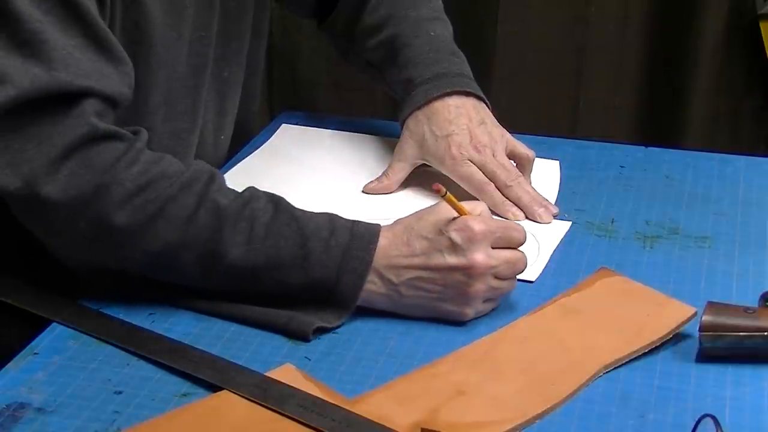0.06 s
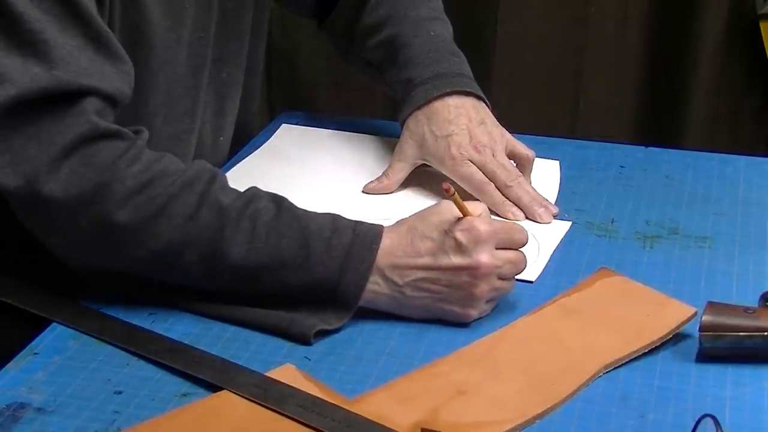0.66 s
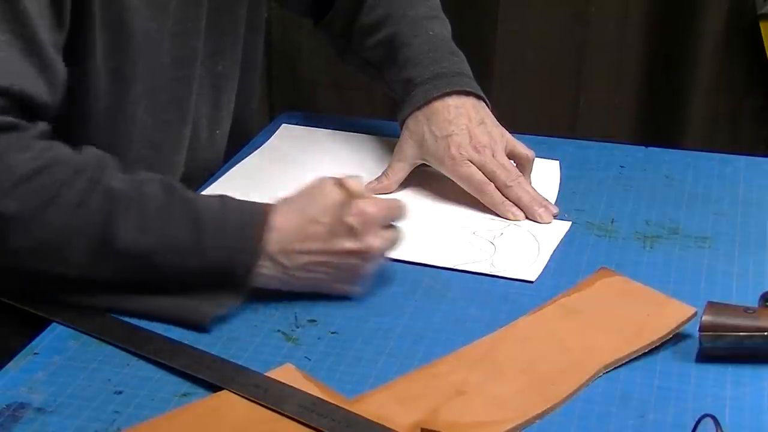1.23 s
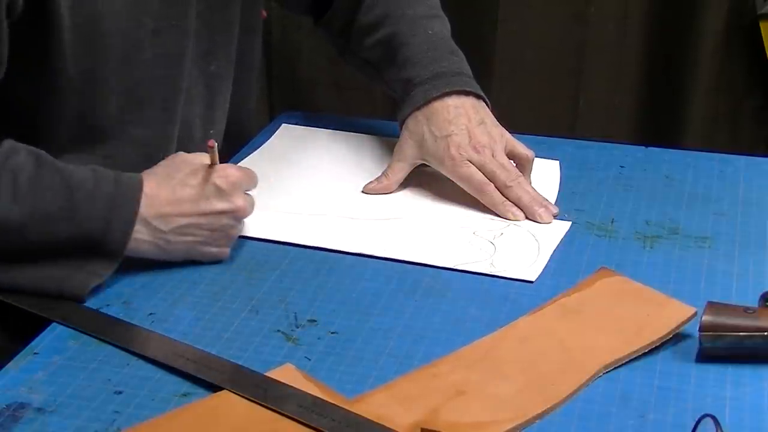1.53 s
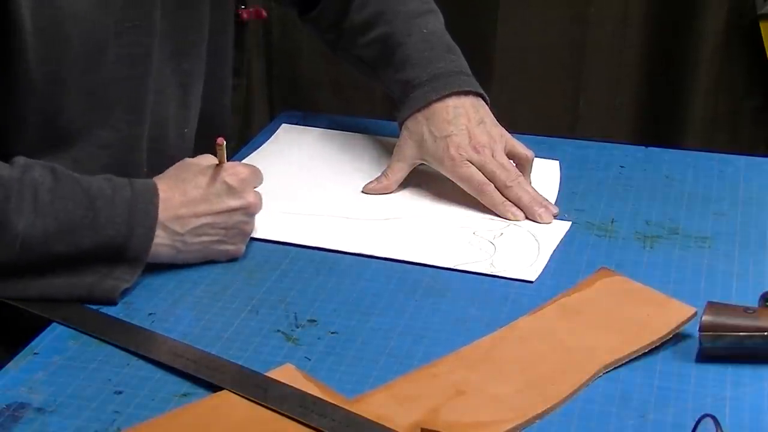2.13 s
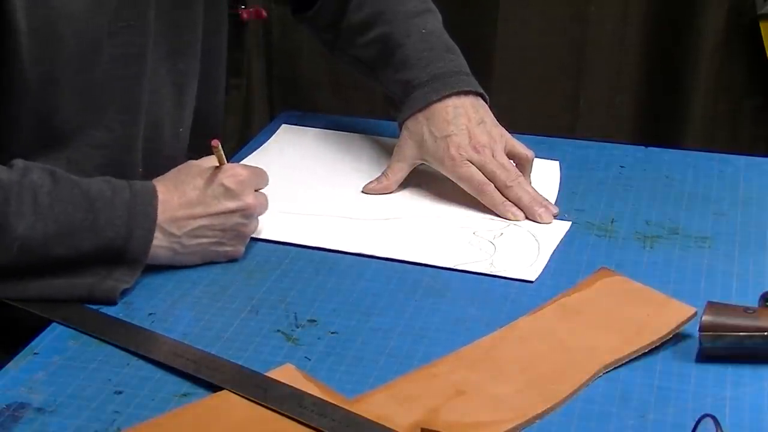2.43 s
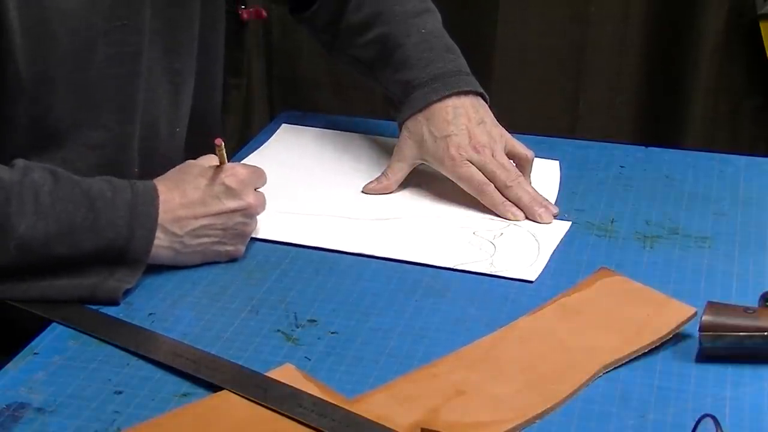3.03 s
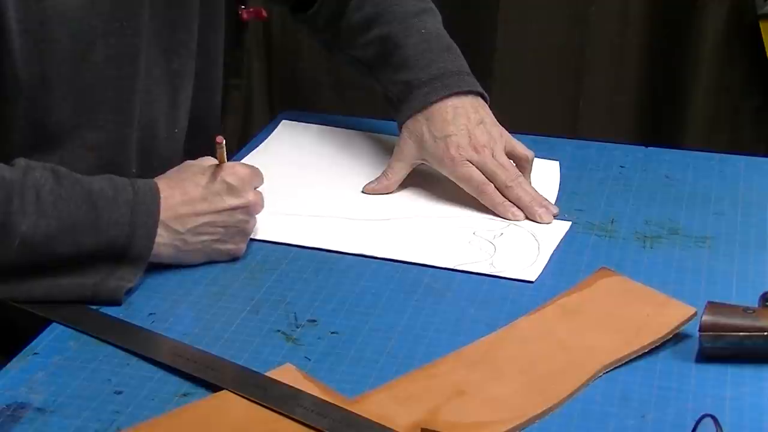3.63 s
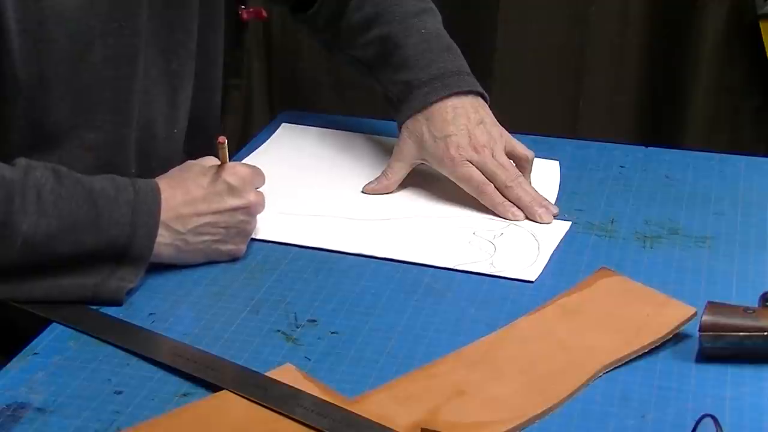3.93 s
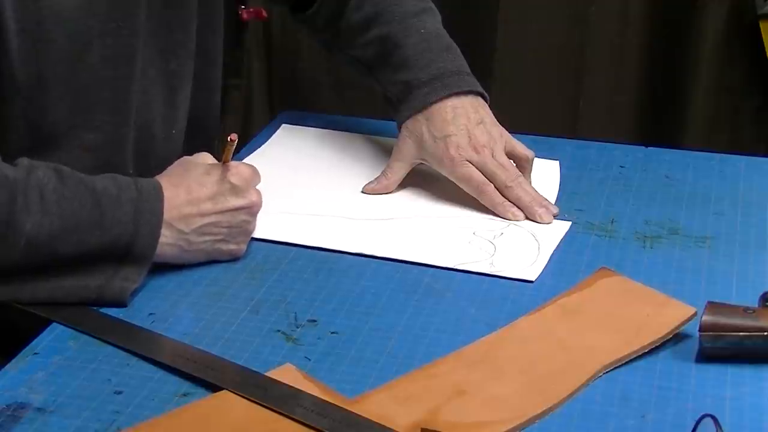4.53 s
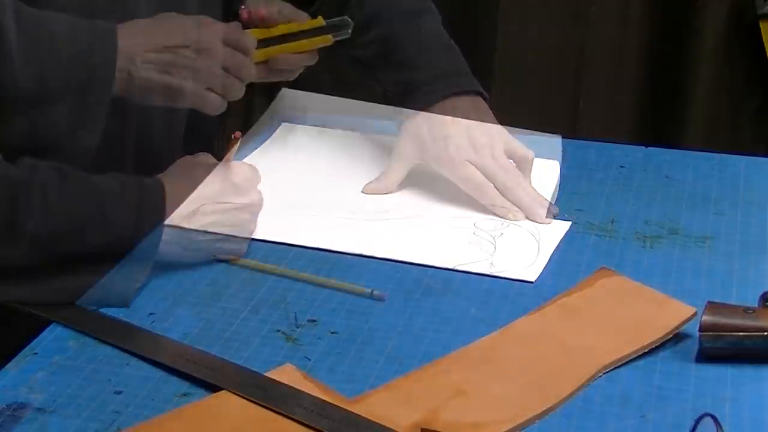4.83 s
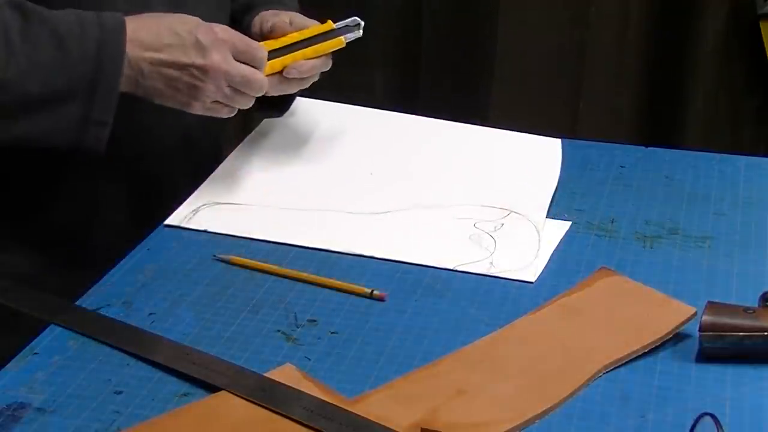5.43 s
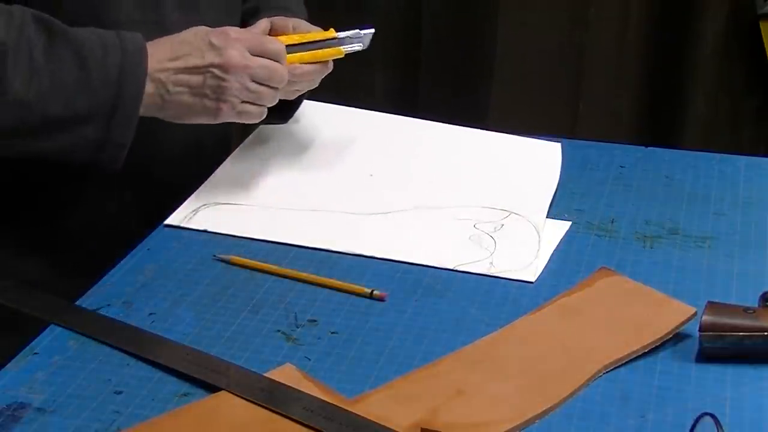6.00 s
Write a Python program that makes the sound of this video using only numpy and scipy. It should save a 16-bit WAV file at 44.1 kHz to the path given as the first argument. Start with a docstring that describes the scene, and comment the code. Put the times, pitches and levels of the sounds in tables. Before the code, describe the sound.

Close by in a small workshop with a low hum, a pencil taps and rubs on paper, squeaking faintly. A hand sweeps over the sheet before a slow drawn line and a series of short back-and-forth strokes. Then a low hollow drone rises and a plastic utility knife clicks over its notches, louder than the drawing. The blade scrapes briefly along its track and more crisp clicks follow, with slight room echo.

```python
"""A pencil traces a pattern on paper over a cutting mat: fibres catch and slip under the lead in short strokes
and one long line; the lead taps, digs in and squeaks thinly, and a hand sweeps the sheet. Then the slider of a
snap-off knife ratchets over its notches: steel snaps, the plastic handle rings. A small workshop hums
underneath and reflects the clicks; a hollow drone fades in at 4.75 s."""
import sys
import numpy as np
from scipy import signal
from scipy.fft import rfft, irfft, next_fast_len
from scipy.io import wavfile
from scipy.ndimage import uniform_filter1d

SR = 44100
rng = np.random.default_rng(int(sys.argv[2]) if len(sys.argv) > 2 else 0)


def file_out(sig):
    """Save sig as 16-bit WAV at sys.argv[1]."""
    # one column per channel
    cols = np.atleast_2d(sig).T
    # limit, then scale
    lim = np.clip(cols, -1, 1)
    pcm = np.round(lim * 32767).astype(np.int16)
    wavfile.write(sys.argv[1], SR, pcm)


N = 276066
TIME = np.arange(N) / SR
# hard contact spectrum, lead taps and blade scrape: f/Hz, level/dB
CONTACT_COLOUR = [(400, -26), (1400, -2.5), (1850, -5.5), (2250, 1.5), (2700, 0.5), (3300, -3), (4000, -2),
                  (5500, -6), (8000, -16), (12000, -11.5), (15500, -38)]


def amp(db):
    """Decibels to gain."""
    return 10 ** (np.asarray(db) / 20)


def unit_rms(x):
    """Scales to rms 1."""
    return x / np.sqrt(np.mean(x ** 2) + 1e-20)


def curve_at(points, hz):
    """Interpolates on a log-frequency axis."""
    f, value = np.transpose(points)
    return np.interp(np.log(hz + 1), np.log(f + 1), value)


def add(mix, start_s, sound):
    """Mixes a sound in at start_s."""
    part = mix[round(start_s * SR):][:len(sound)]
    part += sound[:len(part)]


def coloured(x, colour):
    """Shapes the spectrum, rolling off below its first point; rms 1."""
    size = next_fast_len(x.shape[-1])
    hz = np.fft.rfftfreq(size, 1 / SR)
    gain = amp(curve_at(colour, hz)) * np.minimum(hz / colour[0][0], 1) ** 2
    return unit_rms(irfft(rfft(x, size) * gain, size)[..., :x.shape[-1]])


def noise_pair(size, coherence):
    """Stereo white noise with the given coherence over frequency."""
    a, b = rfft(rng.standard_normal((2, next_fast_len(size))))
    same = curve_at(coherence, np.linspace(0, SR / 2, len(a)))
    return irfft([a, same * a + np.sqrt(1 - same ** 2) * b], next_fast_len(size))[:, :size]


def diffuse(colour):
    """Room-filling noise, alike at both ears only in the bass."""
    coherence = [(30, 0.57), (70, 0.87), (140, 0.32), (280, 0.39), (640, -0.32), (1400, 0.028),
                 (3100, -0.18), (15000, 0.17)]  # f/Hz, left-right coherence
    return coloured(noise_pair(N, coherence), colour)


def flutter(size, depth_db, window):
    """Random gain, smoothed over window samples."""
    return amp(depth_db * unit_rms(uniform_filter1d(rng.standard_normal(size), size=window)))


def impact(colour, decay_s, size=1024):
    """Briefly rattling contact: whitened dying noise through a minimum-phase click."""
    n = np.arange(size)
    burst = rfft(rng.standard_normal(size) * np.exp(-n / SR / decay_s))
    chatter = irfft(burst / np.sqrt(uniform_filter1d(abs(burst) ** 2, size=25))) * np.exp(-n / size)
    log_gain = np.log(amp(curve_at(colour, abs(np.fft.fftfreq(size, 1 / SR)))))
    click = np.fft.ifft(np.exp(np.conj(signal.hilbert(log_gain)))).real
    return signal.fftconvolve(chatter, click / np.linalg.norm(click))


def rub(gain, colour, grain_db, flutter_db=0):
    """Friction: the surface catches and lets go in tiny uneven snaps; flutter_db varies the pressure."""
    snaps = rng.choice([-1, 1], N) * (rng.random(N) < 5000 / SR)  # 5000 per s
    snaps = snaps * amp(grain_db * np.minimum(rng.exponential(1, N), 3))
    pressure = flutter(N, flutter_db, window=300)
    friction = (unit_rms(snaps) + 0.85 * rng.standard_normal(N)) * pressure
    return gain * coloured(friction, colour)


def stroke(start_s, length_s, db, crest=0.5, swell=1.34):
    """Gain of one movement: friction follows hand speed, which peaks at the fraction crest."""
    way = np.clip((TIME - start_s) / length_s, 0, 1) ** (np.log(0.5) / np.log(crest))
    speed = 1 - (2 * way - 1) ** 2
    return amp(db) * speed ** swell


def strokes(rows, **shape):
    """Gain of a run of strokes."""
    return sum(stroke(*row, **shape) for row in rows)


def held(start_s, end_s, db, attack_s, release_s=0.1, db_per_s=0):
    """Gain of a lasting sound: linear rise, level drift, exponential release."""
    rise = np.clip((TIME - start_s) / attack_s, 0, 1)
    fall = np.exp(-np.maximum(TIME - end_s, 0) / release_s)
    return rise * fall * amp(db + db_per_s * (np.clip(TIME, start_s, end_s) - start_s))


def room_tone():
    """Steady workshop air, mostly bass."""
    colour = [(12, -37), (20, -17), (91, -0.5), (150, -6.5), (187, -7), (248, -7), (542, -9), (642, -7),
              (1000, -13.5), (1330, -14.5), (2390, -18), (7950, -25), (11800, -27.5), (14700, -29),
              (16000, -50)]  # f/Hz, level/dB
    return amp(-54.8) * diffuse(colour)


def hum(pitch_hz=64):
    """Low hum, wavering in level and phase."""
    contour = [(0.0, -75), (2.42, -59.5), (3.64, -73), (4.44, -61), (6.26, -68)]  # t/s, level/dB
    times_s, db = np.transpose(contour)
    gain = amp(np.interp(TIME, times_s, db)) * (TIME <= times_s[-1])
    waver = coloured(rng.standard_normal(N), [(1, 0), (4, 0), (12, -30), (60, -100)])
    phase = 2 * np.pi * pitch_hz * TIME + 0.4 * waver[::-1]
    return gain * unit_rms((1 + 0.38 * waver) * np.sin(phase))


def arm_rumble(rest_db=-65):
    """The forearm rests on the bench, then leans ever harder while drawing."""
    colour = [(20, -17), (35, -12), (50, -17), (90, 0.5), (145, -1), (180, -11.5), (220, -8), (300, -15.5),
              (700, -21.5), (1500, -17.5), (3000, -54)]  # f/Hz, level/dB
    lean = held(2.02, 4.66, db=-63.5, attack_s=0.3, release_s=0.18, db_per_s=3)
    return (amp(rest_db) + lean) * diffuse(colour)


def squeaks(growth_db=4):
    """Stick-slip of the lead: a fuzzy, broken whistle gliding with hand speed."""
    glides = [(0, .3, 12460, 11350, -450, 700, -70.5), (0.543, 0.55, 12400, 12550, -600, 700, -72),
              (1.7, 0.14, 11400, 15500, -600, 300, -67), (2.05, .35, 13600, 11900, 1400, 220, -71.5),
              (2.388, .33, 15100, 10900, 500, 200, -71), (2.41, .22, 14300, 11300, 700, 220, -75)]  # t/s, length/s, first f/Hz, last f/Hz, bow/Hz, width/Hz, level/dB
    out = np.zeros(N)
    for start_s, length_s, first_hz, last_hz, bow_hz, width_hz, db in glides:
        way = np.linspace(0, 1, round(length_s * SR))
        arch = 1 - (2 * way - 1) ** 2
        hz = first_hz + (last_hz - first_hz) * way + bow_hz * arch
        pole = np.exp(-np.pi * width_hz / SR)
        fuzz = signal.lfilter([1], np.poly([pole, pole]), rng.standard_normal((len(way), 2)) @ [1, 1j])
        grip = flutter(len(way), depth_db=2.5, window=900)
        tone = (grip * fuzz * np.exp(2j * np.pi * np.cumsum(hz) / SR)).real
        add(out, start_s, unit_rms(tone) * arch ** 0.2 * amp(db + growth_db * (way - 0.5)))
    return out


def taps(bounce_s=0.011, bounce_db=-6):
    """The lead knocks on paper and mat and bounces once."""
    touches = [(0.2635, -45), (0.7219, -39), (0.9222, -42.5), (1.759, -40), (2.003, -36.5), (2.219, -42),
               (3.1206, -40.5), (3.7747, -42.5), (3.933, -45), (4.2498, -47), (4.565, -41), (4.598, -36.5)]  # t/s, level/dB
    out = np.zeros(N)
    for start_s, db in touches:
        for delay_s, drop_db in ((0, 0), (bounce_s, bounce_db)):
            knock = impact(CONTACT_COLOUR, decay_s=0.0036)
            add(out, start_s + delay_s, amp(db + drop_db) * knock / abs(knock).max())
    return out


def curls():
    """The lead rubs over the paper fibres in small, grainy curls."""
    moves = [(.36, 0.16, -51.5), (.705, 0.12, -58), (.91, 0.12, -59), (1.79, 0.079, -60),
             (2.32, 0.087, -57.5)]  # t/s, length/s, level/dB
    colour = [(300, -6), (700, -4.5), (1700, -4.5), (2000, -11), (2400, -2), (3000, -5), (5000, -5),
              (7700, -7), (9000, -1.5), (10500, -9), (12000, -5.5), (15500, -14.5)]  # f/Hz, level/dB
    return rub(strokes(moves), colour, grain_db=4.5)


def hand_sweep():
    """The hand brushes the sheet, with a short extra push near the end."""
    moves = [(1.032, .52, -47.5), (1.358, 0.055, -58)]  # t/s, length/s, level/dB
    colour = [(700, -8), (1100, -8.5), (1600, -9), (2100, -11.5), (3200, -3), (4400, -2.5), (6400, -4),
              (8300, -3), (10900, 1), (12600, -4), (16000, -14)]  # f/Hz, level/dB
    return rub(strokes(moves, crest=0.39, swell=1.13), colour, grain_db=-1, flutter_db=0.5)


def hand_skid():
    """The heel of the hand brakes on the sheet."""
    moves = [(1.398, 0.09, -57)]  # t/s, length/s, level/dB
    colour = [(900, -17), (1350, -7), (1580, 0), (1900, -9), (4000, -23)]  # f/Hz, level/dB
    return rub(strokes(moves), colour, grain_db=4.5)


def long_line():
    """One slow stroke; the lead drags harder twice."""
    moves = [(1.672, 1.04, -56.5)]  # t/s, length/s, level/dB
    catches = [(1.99, 0.052, -64), (2.19, .06, -58.5)]  # t/s, length/s, level/dB
    colour = [(150, 6.5), (320, 8), (700, -0.5), (1000, -3.5), (2000, -3.5), (2550, 3.5), (3350, -6),
              (4150, -2), (4500, -4.5), (5000, -0.5), (5500, -7.5), (7000, -11), (9900, -10), (10700, -11),
              (12300, -10), (15500, -21)]  # f/Hz, level/dB
    gain = strokes(moves, crest=0.3, swell=0.7) + strokes(catches)
    return rub(gain, colour, grain_db=1, flutter_db=1)


def digs(ease_s=0.08, ease_db=-17):
    """The lead bites in at a turn, then eases out with a light rub."""
    turns = [(3.455, 0.059, -49, .48), (4.545, .066, -49, 0.79), (1.795, .088, -52, 0.47)]  # t/s, length/s, level/dB, crest/fraction of length
    colours = [
        [(500, -25), (1550, -11), (1880, 5), (2080, -1), (2300, 0), (2470, -3), (2700, 3.5), (3300, -10),
         (4000, -1.5), (6000, -15.5), (12000, -17), (15500, -28)],
        [(500, -18), (1800, -11), (2700, 1), (3050, -2), (3450, -1), (3950, -3), (4700, -11), (8000, -15),
         (15500, -27)],
        [(900, -6), (1900, -0.5), (3200, -8), (4200, 3.5), (4700, -16), (12000, -23)],
    ]  # per turn: f/Hz, level/dB
    out = np.zeros(N)
    for (start_s, length_s, db, crest), colour in zip(turns, colours):
        bite = stroke(start_s, length_s, db, crest, swell=1.2)
        ease = stroke(start_s + crest * length_s, ease_s, db + ease_db, swell=0.65)
        out += rub(bite + ease, colour, grain_db=4, flutter_db=0.7)
    return out


def hatching():
    """The lead rubs back and forth in short strokes."""
    moves = [(2.775, 0.14, -53), (3.19, 0.19, -54.5), (3.625, 0.15, -54), (4, 0.13, -54),
             (4.368, 0.13, -52.5), (4.7, 0.11, -55.5), (4.85, 0.07, -60.5)]  # t/s, length/s, level/dB
    colour = [(300, -12.5), (600, 2), (900, -8), (1350, -2), (2200, -10), (3100, -9.5), (4000, -5),
              (5300, -9), (6200, -6.5), (7200, -11.5), (9200, -1.5), (10600, -10.5), (12000, 0.5),
              (13200, -9.5), (15700, -13)]  # f/Hz, level/dB
    return rub(strokes(moves), colour, grain_db=-2.5, flutter_db=-1)


def drone():
    """A hollow drone fades in at 4.75 s and slowly weakens."""
    colour = [(100, -16), (210, -11), (245, -6), (272, 2), (310, -19), (390, -8), (520, -20.5),
              (1250, -17.5), (2000, -32), (5000, -57), (12000, -47), (16000, -42)]  # f/Hz, level/dB
    return held(4.75, 6.26, db=-47.5, attack_s=0.24, db_per_s=-3.5) * diffuse(colour)


def handle_ring(pitch_hz, t60_scale=0.99, attack_s=0.00031):
    """Modes of the plastic knife handle, each detuned a little by the grip."""
    modes = [(.79, -14, 0.0063), (.89, -3.5, 0.0083), (1, 2, .01), (1.12, -2.5, 0.011), (1.56, -6, .008),
             (2.03, -6, 0.0063)]  # f/pitch, level/dB, unscaled t60/s
    t = np.arange(2047) / SR
    ring = np.zeros(len(t))
    for ratio, db, t60_s in modes:
        hz = ratio * pitch_hz * rng.normal(1, 0.024)
        ring += amp(db - 60 * t / (t60_s * t60_scale)) * np.sin(2 * np.pi * (hz * t + rng.random()))
    return ring * (1 - np.exp(-t / attack_s)) ** 2


def ratchet(echo_s=0.0057, rms_span_s=0.0029):
    """The steel detent snaps into each notch and rings the handle. Returns direct sound, bright echo."""
    notches = [(5.0993, -26, -0.5, 2680, -32.5), (5.1241, -25.5, 4, 2710, -42),
               (5.1625, -25, 4.5, 2890, -37), (5.1968, -26, 5, 2800, -38.5), (5.2539, -25, 1.5, 2950, -34),
               (5.4136, -26.5, 1.5, 2930, -39.5), (5.53, -31.5, -5.5, 3040, -34),
               (5.8727, -24.5, 7.5, 2600, -34.8), (5.8912, -25.5, 1.5, 2580, -37),
               (5.9116, -23.8, 6, 2890, -36.5), (6.0307, -23, 11.5, 2590, -34),
               (6.066, -22.5, 14.5, 2700, -32), (6.1563, -22, 15, 2615, -32)]  # t/s, snap level/dB, top treble boost/dB, handle f/Hz, handle level/dB
    snap_colour = [(1000, -24.5), (1700, -13.5), (3700, -10.5), (4500, -12.5), (5400, -6.5), (7300, -3),
                   (8700, -2.5), (10000, -1.5), (12400, 0.5), (14500, -5), (16000, -14.5)]  # f/Hz, level/dB
    direct, echo = np.zeros((2, N))
    norm = np.sqrt(rms_span_s * SR)
    for start_s, snap_db, boost_db, handle_hz, handle_db in notches:
        colour = [(hz, db + boost_db * np.interp(hz, [8500, 12000], [0, 1])) for hz, db in snap_colour]
        snap = impact(colour, decay_s=0.0013)
        snap *= amp(snap_db) * norm / np.linalg.norm(snap)
        ring = handle_ring(handle_hz)
        ring *= amp(handle_db) * norm / np.linalg.norm(ring)
        add(direct, start_s, snap + ring)
        add(echo, start_s + echo_s, amp(-2.1) * snap + amp(-14) * ring)
    return direct, echo


def blade_scrape():
    """The blade rubs along its steel track: a shove, then a light glide."""
    shove = held(5.49, 5.522, db=-47.5, attack_s=0.025, release_s=0.039)
    glide = held(5.5, 5.86, db=-62, attack_s=0.03, release_s=0.012)
    return rub(shove + glide, CONTACT_COLOUR, grain_db=4.5, flutter_db=2)


def wall_echoes(x):
    """Three distinct reflections."""
    reflections = [(0.0097, -18), (0.0165, -13), (.0272, -23)]  # delay/s, level/dB
    out = np.zeros(N)
    for delay_s, db in reflections:
        add(out, delay_s, amp(db) * x)
    return out


def reverb(x, build_s=0.0035, scatter_db=7, scatter_s=0.0061):
    """Diffuse tail: dense scatter off the bench, then each band dying at its own rate."""
    decay = [(300, 0.42), (1500, 0.86), (2800, 0.32), (5000, 0.45), (10000, 0.32), (15000, 0.22)]  # f/Hz, t60/s
    coherence = [(700, -0.099), (1500, 0.16), (2600, 0.89), (5000, 0.62), (12000, -0.12)]  # f/Hz, left-right coherence
    size = SR // 2
    hz, frame_s, bands = signal.stft(noise_pair(size, coherence), SR, nperseg=256)
    bands *= amp(-60 * frame_s / curve_at(decay, hz)[:, None])
    tail = signal.istft(bands, SR)[1][:, :size]
    t = np.arange(size) / SR
    tail *= (1 - np.exp(-t / build_s)) * (1 + amp(scatter_db) * np.exp(-t / scatter_s))
    return signal.fftconvolve(x[None], tail / np.linalg.norm(tail[0]), axes=1)[:, :N]


def scene():
    """Pencil and knife near the centre of the workshop; the gains here trim the table levels."""
    drawing = amp(1.5) * curls() + amp(1.2) * hatching() + hand_sweep() + hand_skid()
    drawing += amp(1.36) * long_line() + amp(-0.5) * digs() + amp(-1) * taps() + squeaks()
    clicks, click_echo = ratchet()
    knife = clicks + blade_scrape()
    near = drawing + knife + click_echo + wall_echoes(knife)
    wet = amp(-2.5) * reverb(drawing) + amp(-1.5) * reverb(knife)
    background = amp(-1) * hum() + room_tone() + arm_rumble() + drone()
    return (near + wet) * amp([[-0.4], [0.4]]) + background * amp([[-0.8], [1]])


def record(dry):
    """Steep low-pass at 15.9 kHz."""
    lowpass = signal.firwin(255, 15900, window=("kaiser", 8), fs=SR)
    return signal.oaconvolve(dry, lowpass[None], "same")


dry = scene()
out = record(dry)
file_out(out)
```